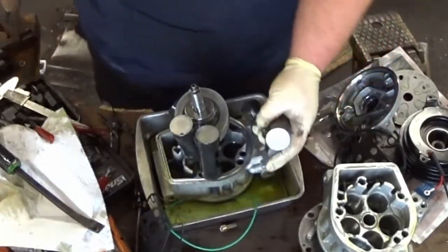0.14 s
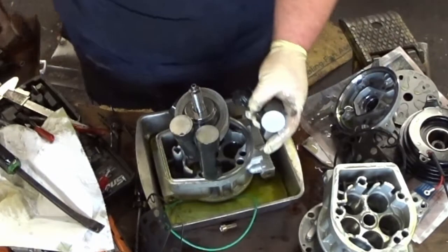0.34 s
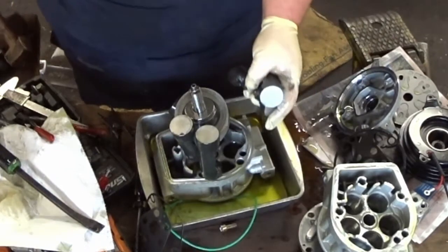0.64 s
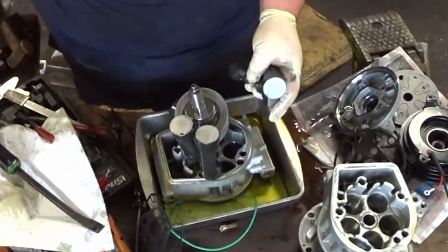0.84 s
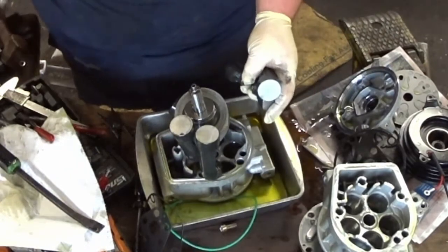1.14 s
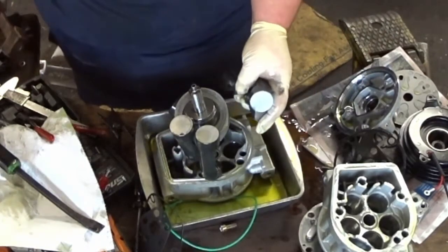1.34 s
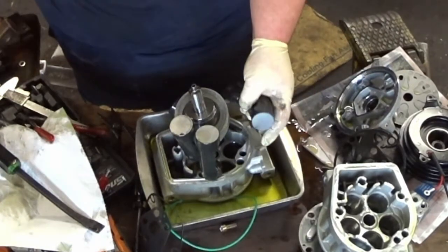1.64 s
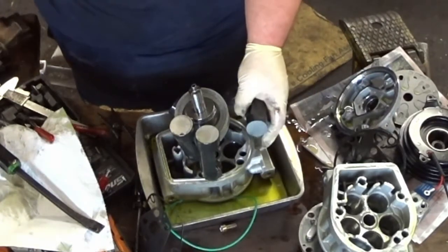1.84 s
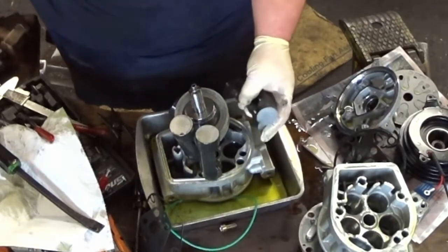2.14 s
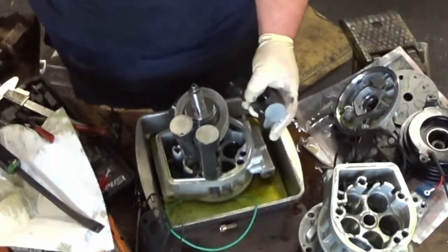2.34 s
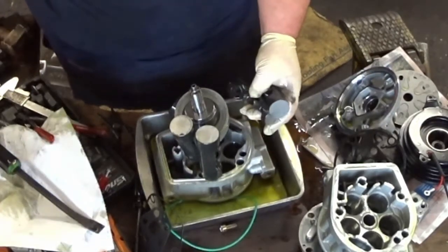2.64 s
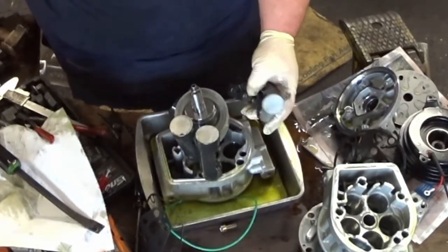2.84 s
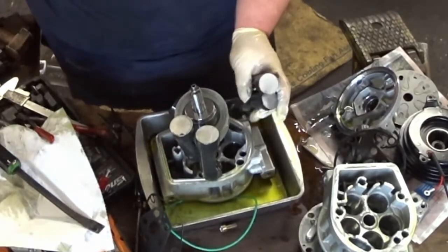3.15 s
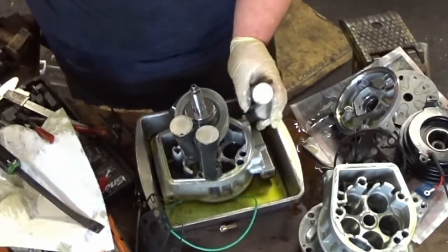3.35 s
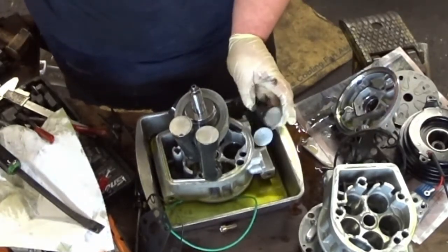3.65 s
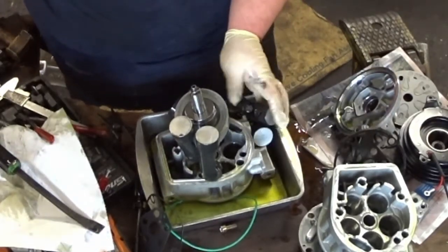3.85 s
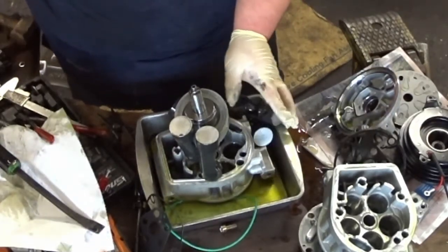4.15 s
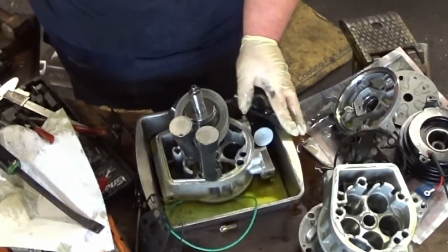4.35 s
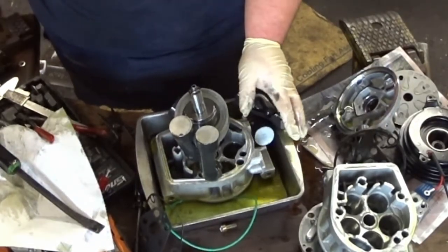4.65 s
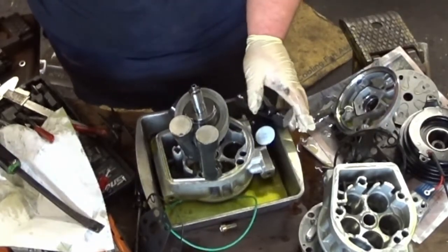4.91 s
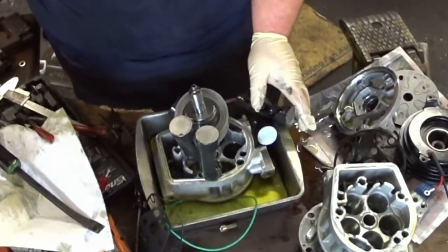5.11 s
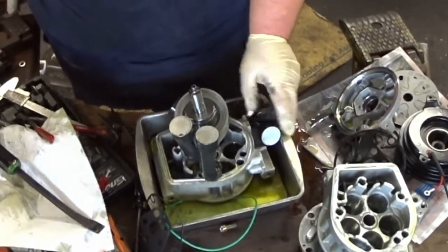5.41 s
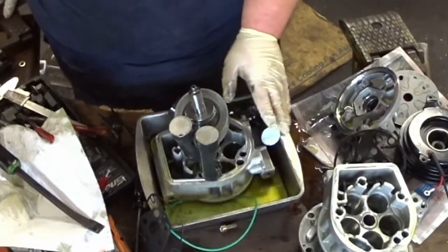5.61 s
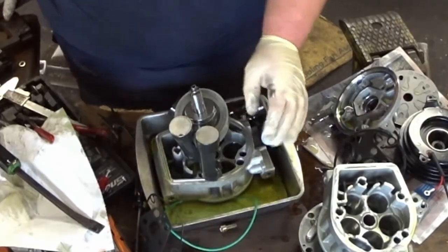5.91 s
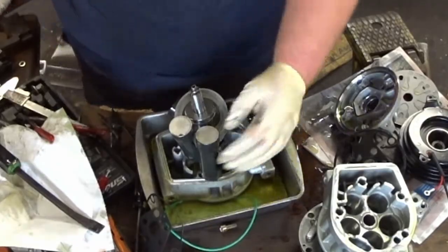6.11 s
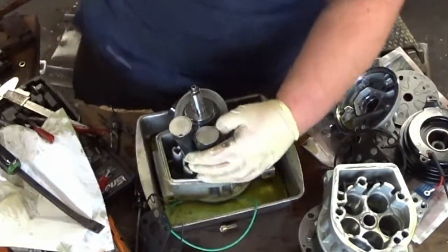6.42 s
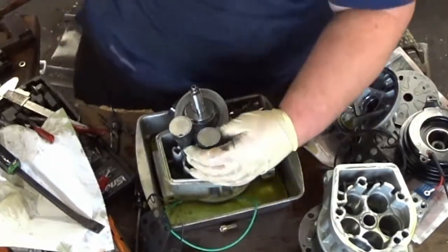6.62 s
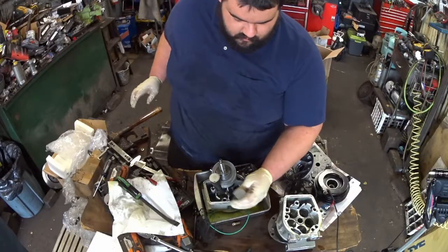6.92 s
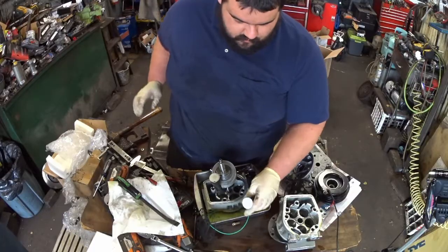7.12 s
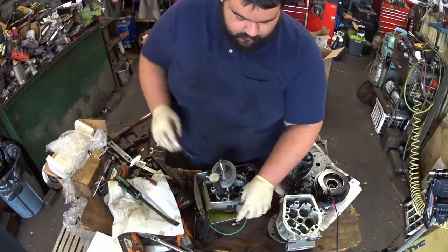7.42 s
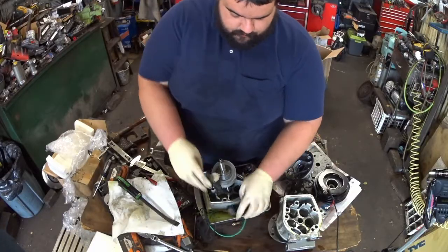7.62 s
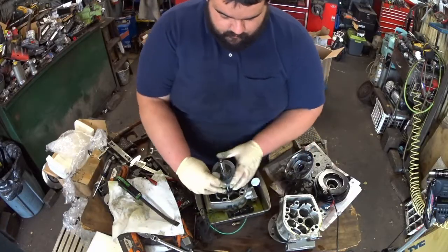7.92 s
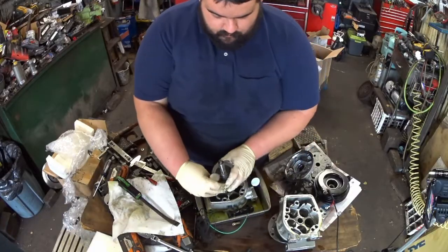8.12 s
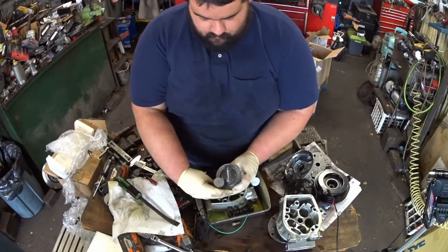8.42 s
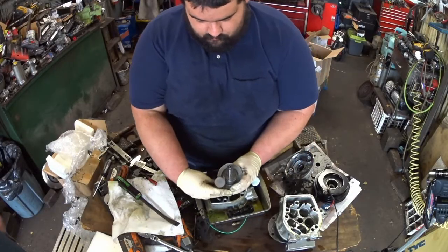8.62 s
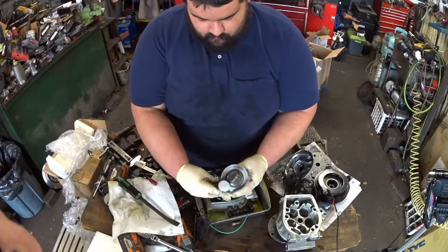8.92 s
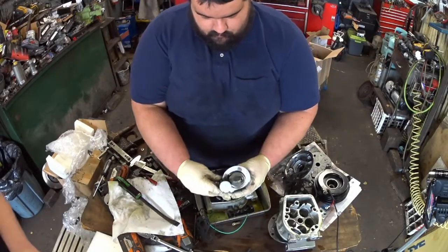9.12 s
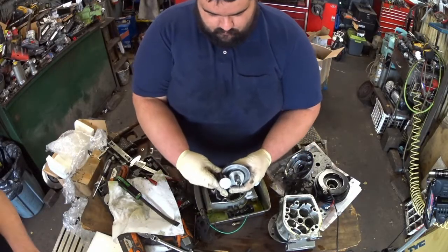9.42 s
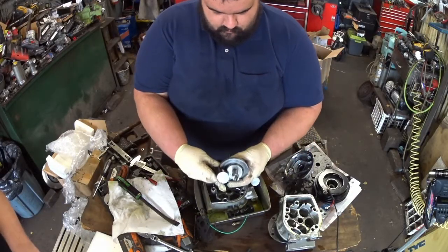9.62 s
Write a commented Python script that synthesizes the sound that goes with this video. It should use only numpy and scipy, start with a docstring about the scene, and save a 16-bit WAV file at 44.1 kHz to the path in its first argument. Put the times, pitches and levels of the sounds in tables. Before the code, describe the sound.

Greasy metal compressor parts clink, knock and clang against a heavy casing in a steel pan, with short rattles and scrapes in a quiet workshop.

```python
"""Compressor assembly on a bench

Greasy parts of a piston compressor are fitted by hand into their casing, in a steel pan on a workshop bench.
Each contact is a short noise crack, a dense clang and the decaying modes of the part that is struck.
Random slips, filtered or resonated, make the scrapes, crackles, rattles, drags and drone between blows.
Heavy blows and shoves swing low bench modes; two ports hear it all with a short echo and quiet shop air."""
import sys
import numpy as np
from scipy import signal
from scipy.fft import rfft, irfft, next_fast_len
from scipy.io import wavfile
from scipy.ndimage import uniform_filter1d

SR = 44100
rng = np.random.default_rng(int(sys.argv[2]) if len(sys.argv) > 2 else 0)


def int16_out(signal):
    """Quantize to a 16-bit WAV file."""
    q = np.round(np.clip(np.atleast_2d(signal).T, -1, 1) * 32767)
    wavfile.write(sys.argv[1], SR, q.astype(np.int16))


N = 430416
TIME_S = np.arange(N) / SR
BAND_EDGES_HZ = 56 * 2 ** (np.arange(17) / 2)

# Blows on the casing: [t/s, strength/dB, brightness/(dB/octave), ring re strength/dB, thud/dB]
CASING_HITS = [(0.4253, -38, -1.5, -3.5, -53), (0.5651, -46, -10, 4, -66), (1.0929, -19, 2, -12.5, -40),
               (1.3376, -46.5, -13.5, -2.5, -46.5), (1.367, -40.5, -4.5, 1, -54),
               (1.8139, -23.5, -1, 4.5, -43), (3.4187, -25, 0, -2.5, -23.5), (3.4487, -34, 3, -7, -59),
               (3.5433, -23, -1, -11, -37.5), (3.603, -35, 2, 1, -38), (3.7794, -25.5, 3, -4.5, -48),
               (3.8134, -33, 3, -14, -49.5), (3.8369, -30, 1.5, -3, -47.5), (4.3576, -30.5, -5.5, -20, -36),
               (5.1346, -21, 0, 4, -45), (5.198, -26.5, -1.5, 2.5, -39.5), (5.4769, -35, -0.5, -2, -39.5),
               (5.5036, -20, 0, -10, -30), (5.5467, -23.5, 3.5, -3, -63), (5.586, -23, 6, -9, -60),
               (5.7951, -47.5, -6, -15, -50.5), (7.3448, -40.5, -4.5, -34, -43), (7.5408, -23, 0, -20, -25),
               (7.5975, -25.5, -2, -8, -31), (7.6055, -24.5, 5, -7, -51), (7.7109, -22.5, -1.5, -13, -23.5),
               (7.7363, -27, -0.5, -19, -50), (8.67, -29.5, -0.5, -4, -30.5), (9.177, -55, -19, -4, -53),
               (9.4177, -44.5, -7, -8, -47.5)]
# Blows on lighter parts: [t/s, strength/dB, brightness/(dB/octave), ring re strength/dB]
PISTON_HITS = [(3.0044, -34, -6, -9), (3.0124, -30, -5, 12.5), (3.0331, -23, -1.5, 5.5)]
TING_HITS = [(1.998, -37, -4.5, 17.4), (2.081, -38, -4.5, 22), (2.199, -42.5, -4, 1.8),
             (4.0315, -49, -5.5, 16), (4.075, -72, 0, 21)]
CLINK_HITS = [(.6074, -40, 5.5, -5), (.6576, -28, 0, 2.5)]
SHAFT_HITS = [(7.1655, -25, 2, .5), (7.7554, -27, .7, -8)]
PLATE_HITS = [(3.425, -28, -9.5, -10), (3.5663, -22, -4, -13.5), (5.5554, -17.5, -5, -11),
              (7.6293, -25, 4.5, -12.5), (7.6805, -26, -8.5, -9), (7.7876, -23, -9, -7)]
SHOE_HITS = [(0.6074, -44, -7, 11.5), (0.835, -49.5, -6, 15), (0.8443, -31.5, 6, -24),
             (0.9191, -36, 2, 1.5), (0.9745, -31, 15.5, -5), (1.0079, -29.5, 12.5, -4),
             (1.0528, -30, 10, -2), (1.071, -44, -7, 21), (1.2847, -42, -2, -18), (2.5348, -54, 7, -5),
             (2.6064, -50.5, 6.5, -24), (3.5838, -40.5, 8.5, -0.5), (3.6597, -18.5, 1, -9.5),
             (8.3316, -50.5, 1.5, -5), (8.5129, -49, 1.5, -3.5), (8.94, -49, -1, -2.5)]
SEAT_HITS = [(5.6596, -8, 2.5, 13.7), (8.7617, -29, 6.5, 20.4), (8.8319, -18.5, 0.5, 31.5),
             (9.0254, -21.5, -4.5, 38.2)]

# Ringing modes of each struck part: [f/Hz, relative level/dB, t60/s]
CASING_MODES = [(146.6, -2, 0.3), (255, -3, 0.86), (650, -26, .1), (870, -5.5, 0.091), (1187, 8.5, 0.028),
                (1292, -2.5, 0.27), (1352, 1.5, 0.22), (1753, -7, 0.11), (1986, 0.5, 0.12),
                (2068, -2, 0.19), (3175, -2.5, 0.2), (3470, -6.5, 0.15), (3360, -21, 0.067),
                (4220, -11, 0.37), (4630, 9.5, 0.038), (5710, 2, 0.054), (5860, -4, 0.19),
                (8000, -3.5, 0.2), (10060, -8.5, 0.45)]
PISTON_MODES = [(1513, -9, .13), (1938, 0, .27), (3112, -9, .27), (3230, -7, .15), (3580, -6, .28),
                (4630, -14, .2), (5093, -8, .45), (5112, -13, .3), (5868, -5, .3), (6169, -6, .12),
                (6778, -8, .15), (7273, -7, .2), (8021, -13, .2), (8296, -8, .2), (10020, -20, .25)]
TING_MODES = [(965, -6, .07), (1938, 0, .5), (3941, -7, .25), (7268, -10, .2), (8296, -7, .17),
              (9695, -8, .15)]
CLINK_MODES = [(2990, -2, .35), (3200, -4, .06), (3500, 0, .28), (4810, -6, .3), (5690, -1, .33),
               (6820, -6, .12)]
SHAFT_MODES = [(1335, -8, .25), (1836, -9, .25), (2542, -3, .38), (2565, -7, .35), (3315, -7, .36),
               (3340, -11, .3), (4210, -11, .26), (4646, 0, .16), (4861, -7, .2), (5130, -6, .2),
               (5870, -7, .28), (5898, -11, .25), (8080, -9, .17), (10940, -11, .15)]
PLATE_MODES = [(2690, -17, 0.21), (3240, -8, 0.1), (3310, -3, 0.34), (3288, 12.5, 0.06), (4260, -38, 0.14),
               (5400, -10, .2), (5300, -14.5, 0.055)]
SHOE_MODES = [(4260, -1.5, 0.21), (4680, 8, 0.041), (4850, 8, 0.044), (5565, 15, 0.02), (6060, -8, 0.059),
              (8900, -7, 0.033), (8850, 13, 0.019), (9200, -4, 0.057), (10000, 10, 0.042)]
SEAT_MODES = [(3270, -21.5, 0.037), (3500, -9, 0.039), (4700, -42.5, 0.17), (5420, -33.5, 0.1),
              (5820, -31, 0.052), (9530, -21.5, 0.054)]

# Colour that pan and bench give every crack and clang: [f/Hz, level/dB]
BENCH_COLOUR = [(65, -55), (95, -49), (135, -1), (190, -2.5), (270, 5.5), (380, -1.5), (540, 2), (1100, 0),
                (1500, -2), (3000, -3), (6000, -1), (8600, 0), (12000, -3.5)]
# Dense clang of casing and pan: [f/Hz, level/dB]
CLANG_COLOUR = [(130, -1.5), (400, -0.5), (1400, 3.5), (3500, -1), (6000, -7), (11000, -16)]
# A contact: one hump tilted by hardness, plus a low thud
THUD_HZ, THUD_FALL_DB_PER_OCT, HARDEST_HZ = 223, 3, 7860
SOFTEST_HZ = 900  # tilt is constant below
CLANG_FOLLOWS_DB_PER_DB = 0.26  # share of a hit's ring level passed to the clang

# Bench top swinging under the casing: [f/Hz, level re thud/dB, t60/s]
THUMP_MODES = [(144, -3, 0.12), (254.5, 0.5, 0.14), (337, -9, .1)]
# Shoves of the bench: [t/s, level/dB]
SHOVES = [(2.202, -23), (8.672, -40)]
# Low modes in which the bench sways: [f/Hz, relative level/dB, t60/s]
SWAY_MODES = [(29.3, -14, 0.46), (46.5, -10.5, 0.29), (80, -12, 0.14), (105, -11, .13), (140, 1.5, 0.076),
              (281, -24.5, 0.99), (329, -13.5, 0.21)]

# Soft scrapes and rubs of hands and parts: [t/s, length/s, level/dB]
SCRAPES = [(1.27, 0.16, -62.5), (1.69, 0.068, -48), (2.25, .06, -41.5), (2.94, 0.16, -38.5),
           (5.33, 0.2, -43.5), (5.46, 0.34, -48), (6.65, 0.11, -50.5), (7.47, 0.39, -47),
           (7.58, 0.083, -35), (8.66, 0.27, -51.5), (8.95, 0.064, -41), (9.1, 0.18, -54.5)]
# Scrape spectrum: [f/Hz, level per Hz/dB]
SCRAPE_COLOUR = [(100, -14), (250, 0), (600, 1.5), (1100, -3), (2000, -13), (3500, -16.5), (6000, -24),
                 (11000, -31)]
# Oil film crackling as parts draw apart: [t/s, length/s, level/dB]
CRACKLES = [(1.1, 0.096, -42.5), (5.42, 0.17, -42.5), (6.0, 0.18, -57.5), (6.65, 0.14, -54.5),
            (7.83, 0.26, -48.5), (8.41, 0.059, -56), (8.65, 0.11, -48.5), (8.935, 0.02, -49),
            (9.17, 0.088, -61)]
# Shoe rattling in its socket: [t/s, length/s, level/dB]
RATTLES = [(3.578, 0.011, -45), (3.661, 0.18, -22)]
# Part catching, then dragging over the casing: [t/s, length/s, level/dB]
DRAGS = [(.563, 0.0065, -30.5), (.6, 0.25, -38)]
# Plate turned by hand: [t/s, length/s, level/dB]
TURNS = [(8.16, .02, -54), (8.245, .16, -53), (8.8, 0.056, -38), (8.94, 0.1, -41.5), (9.04, 0.26, -41),
         (9.38, 0.017, -46)]
# Modes driven by slips: [f/Hz, level before a -6 dB/octave tilt/dB, t60/s]
RATTLE_MODES = [(2580, -9.5, 0.097), (3200, -1, 0.024), (3360, 8.5, 0.0098), (4700, -6, 0.026),
                (5360, -3, 0.041), (9070, -1, 0.022), (9100, 4, 0.019), (9150, -9, 0.0061),
                (10200, -22, .008)]
DRAG_MODES = [(1037, 1, 0.072), (1007, -2, 0.076), (1136, 0.5, 0.1), (1093, -11, 0.13), (1820, -2.5, 0.056),
              (2970, -20, 0.084), (3430, -21, 0.061)]
PAN_MODES = [(153, 0.5, 0.26), (163.2, 3, 0.21), (216, -12, 0.076), (248, 12, 0.25), (269, -32, 0.055),
             (570, -1, 0.11)]
WAVER_PER_S, WAVER_DB = 18, 2.5  # uneven grip on the plate

# Lead of the right port over the left: [f/Hz, phase/rad]
PORT_PHASE = [(20, .05), (120, 0.49), (430, 1.03), (950, 1.55), (2000, 1.34), (4000, 0.78), (6200, 0.56),
              (11000, 0.33)]
# Decay of the shop: [f/Hz, t60/s]
ROOM_T60 = [(100, 0.71), (500, 0.48), (2000, 0.54), (5000, 0.64), (11000, 0.42)]
# Air of the shop, spectrum: [f/Hz, level per Hz/dB]
AIR_COLOUR = [(15, -22), (25, -7.5), (64, -2), (192, -4), (311, -5.5), (444, -7), (531, -12), (635, -8),
              (1230, -11.5), (1330, -12), (1430, -10.5), (2210, -12), (3080, -13.5), (5970, -14.5),
              (11000, -18), (14300, -114), (22000, -120)]
# Difference between ports in a diffuse field: [f/Hz, side re mid/dB]
AIR_SIDE = [(60, -14), (130, -9), (270, -4), (570, 2.5), (1200, 3.5), (2600, 0.5), (5500, -4),
            (11000, -6.5)]
AIR_DB = -56.5  # before widening
CUTOFF_HZ = 11100


def blows():
    """All contacts, part by part."""
    heavy = casing_blows() + piston_clangs() + shaft_blows() + plate_blows()
    return heavy + piston_tings() + piston_clinks() + shoe_blows() + seat_blows()


def casing_blows():
    """Wide casing, hit on a new spot each time: mode levels scatter."""
    return struck(CASING_HITS, CASING_MODES, centre_hz=1860, arch_db=2.5, crack_db=-1, ring_db=-7,
                  clang_db=-12, crack_t60_s=0.048, rise_s=0.00027, clang_t60_s=0.4, scatter_db=3)


def piston_clangs():
    """Piston clang: many modes, slow onset."""
    return struck(light(PISTON_HITS, thud_db=-18), PISTON_MODES, centre_hz=3400, arch_db=4.0, crack_db=0.5,
                  ring_db=-4.0, clang_db=-17, crack_t60_s=0.021, rise_s=0.0012, clang_t60_s=0.26)


def shaft_blows():
    """Shaft: paired close modes beat."""
    return struck(light(SHAFT_HITS, thud_db=-12), SHAFT_MODES, centre_hz=3150, arch_db=1.6, crack_db=2.5,
                  ring_db=-1.0, clang_db=-11.5, crack_t60_s=0.04, rise_s=0.00075, clang_t60_s=0.23)


def plate_blows():
    """Plate: ring gained well above its crack."""
    return struck(light(PLATE_HITS, thud_db=-18), PLATE_MODES, centre_hz=3420, arch_db=6.5, crack_db=-5.5,
                  ring_db=6.5, clang_db=-18, crack_t60_s=0.028, rise_s=0.0006, clang_t60_s=0.3)


def piston_tings():
    """Light piston ting: few modes, short crack."""
    return struck(light(TING_HITS, thud_db=-8), TING_MODES, centre_hz=1870, arch_db=2.5, crack_db=-0.5,
                  ring_db=-5.5, clang_db=-22.5, crack_t60_s=0.011, rise_s=0.00062, clang_t60_s=0.26)


def piston_clinks():
    """Piston clink: high modes with a very weak thud."""
    return struck(light(CLINK_HITS, thud_db=-31), CLINK_MODES, centre_hz=3440, arch_db=6.5, crack_db=2,
                  ring_db=-8, clang_db=-8.5, crack_t60_s=0.019, rise_s=0.00036, clang_t60_s=0.25)


def shoe_blows():
    """Small steel shoes: high, mostly brief modes."""
    return struck(light(SHOE_HITS, thud_db=-20), SHOE_MODES, centre_hz=3410, arch_db=3.5, crack_db=-2.5,
                  ring_db=-1.5, clang_db=-18, crack_t60_s=0.022, rise_s=0.00058, clang_t60_s=0.85)


def seat_blows():
    """Seat: short crack, weak clang, brief modes."""
    return struck(light(SEAT_HITS, thud_db=-13), SEAT_MODES, centre_hz=1850, arch_db=4, crack_db=-13,
                  ring_db=-6.5, clang_db=-30, crack_t60_s=0.0096, rise_s=0.0011, clang_t60_s=0.24)


def light(hits, thud_db):
    """A light part thuds in proportion to the strength of its blow."""
    return [(s, db, bright, ring, db + thud_db) for s, db, bright, ring in hits]


def struck(hits, modes, centre_hz, arch_db, crack_db, ring_db, clang_db,
           crack_t60_s, rise_s, clang_t60_s, scatter_db=0):
    """Blows on one part; a harder contact favours higher modes, the next touch chokes the ring."""
    out = np.zeros(N)
    hz, mode_db, t60_s = np.transpose(modes)
    t = np.arange(SR * 3 // 5) / SR
    decays = from_db(-60 * t / t60_s[:, None])
    rings = np.sin(2 * np.pi * hz[:, None] * t) * decays * (1 - np.exp(-t / rise_s))
    rings[::2] *= -1
    drives_db = contact(hits, hz, centre_hz, arch_db)
    drives_db = drives_db + scatter_db * rng.standard_normal((len(hits), len(hz)))
    free_s = np.diff([hit[0] for hit in hits], append=np.inf)
    noises = cracks(hits, centre_hz, arch_db, clang_db, crack_t60_s, rise_s, clang_t60_s)
    for (s, _, _, ring, _), crack, drive_db, free in zip(hits, noises, drives_db, free_s):
        gains = from_db(ring_db + ring + mode_db + drive_db)
        choke = np.exp(-np.maximum(t - free, 0) / .008)
        add(out, s, from_db(crack_db) * crack)
        add(out, s, (gains @ rings) * choke)
    return out


def contact(hits, hz, centre_hz, arch_db):
    """Level/dB each blow (row) hands each frequency (column): a tilted hump or a low thud."""
    _, db, bright, _, thud = np.transpose(hits)[:, :, None]
    hz = np.clip(hz, THUD_HZ, HARDEST_HZ)
    tilt = bright * np.log2(np.maximum(hz, SOFTEST_HZ) / centre_hz)
    hump = db + tilt - arch_db * np.log2(hz / centre_hz) ** 2
    return np.maximum(hump, thud - THUD_FALL_DB_PER_OCT * np.log2(hz / THUD_HZ))


def cracks(hits, centre_hz, arch_db, clang_db, crack_t60_s, rise_s, clang_t60_s, spacing_hz=11):
    """Each contact cracks like noise, then the many close modes of casing and pan clang on."""
    t = np.arange(SR // 2) / SR
    first = SR // 100  # samples
    white = rng.standard_normal((len(hits), 2, len(t)))
    # about one mode per spacing_hz; each blow shares its energy among them anew
    grid_hz = np.fft.rfftfreq(len(t), 1 / SR)
    is_mode = rng.random(len(grid_hz)) < grid_hz[1] / spacing_hz
    chord = rms_one(irfft(rfft(rng.standard_normal(white.shape)) * is_mode, len(t)))
    rings_db = np.array([[ring] for _, _, _, ring, _ in hits])
    clangs_db = clang_db + CLANG_FOLLOWS_DB_PER_DB * rings_db
    onset = 1 - np.exp(-t / rise_s)
    sounds = 0
    for k, (hz, sos) in enumerate(bands()):
        band_t60_s = crack_t60_s * (hz / 2000) ** -.15
        crack = from_db(-60 * t / band_t60_s)
        clang = from_db(clangs_db + at_hz(CLANG_COLOUR, hz)) * from_db(-60 * t / clang_t60_s)
        source = onset * (white[:, k % 2] * crack + chord[:, k % 2] * clang)
        band = signal.sosfilt(sos, source)
        # set early energy per band; low bands take a few cycles to build up
        early = band[:, :first + round(3 * SR / hz)]
        strength = np.sqrt(np.sum(early ** 2, axis=1) / first * 2)
        db = contact(hits, hz, centre_hz, arch_db) + at_hz(BENCH_COLOUR, hz)
        sounds = sounds + band * from_db(db) / strength[:, None]
    return sounds


def bench():
    """The bench thumps under blows on the casing and sways when shoved."""
    thuds = [(s, thud) for s, *_, thud in CASING_HITS]
    return swing(SHOVES, SWAY_MODES) + swing(thuds, THUMP_MODES)


def swing(pushes, modes):
    """Soft pushes set low modes swinging, neighbouring modes in opposite directions."""
    out, t = np.zeros(N), np.arange(SR) / SR
    motion = 0
    for k, (hz, db, t60_s) in enumerate(modes):
        sign = -(-1) ** k
        motion = motion + sign * from_db(db - 60 * t / t60_s) * np.sin(2 * np.pi * hz * t)
    for s, db in pushes:
        add(out, s, from_db(db) * motion * (1 - np.exp(-t / .003)))
    return out


def handling():
    """Stick and slip between the blows."""
    return scrapes() + oil_crackles() + shoe_rattle() + casing_drag() + pan_drone()


def scrapes():
    """Scrapes and rubs: dense slips, coloured mostly low."""
    return swells(SCRAPES) * rms_one(coloured(grains(per_s=2100, spread_db=3.5), SCRAPE_COLOUR))


def oil_crackles():
    """Oil film parting: uneven grains in the high band."""
    oil_band = signal.butter(2, [5500, 11000], "band", fs=SR, output="sos")
    oil = signal.sosfilt(oil_band, grains(per_s=3700, spread_db=5.5) + 1e-18)
    return swells(CRACKLES) * rms_one(oil)


def shoe_rattle():
    """Shoe in its socket: slips drive short, high modes."""
    push = strokes(RATTLES, attack_s=0.0024, sag_db_per_s=113, release_db_per_s=224)
    return push * rubbed(RATTLE_MODES, per_s=3600, even_s=0.066)


def casing_drag():
    """A dragged part makes the casing sing through slip-driven modes."""
    push = strokes(DRAGS, attack_s=0.0036, sag_db_per_s=22, release_db_per_s=404)
    return push * rubbed(DRAG_MODES, per_s=1500, even_s=0.016)


def pan_drone():
    """Turning the plate excites low pan modes; negative sag: each turn grows."""
    push = strokes(TURNS, attack_s=0.0098, sag_db_per_s=-3.5, release_db_per_s=500)
    return push * rubbed(PAN_MODES, per_s=260, even_s=0.074) * waver()


def grains(per_s, spread_db):
    """Random tiny slips of uneven size and either sign."""
    is_slip = rng.random(N) < per_s / SR
    size = from_db(spread_db * np.minimum(rng.exponential(1, N), 4))
    return is_slip * rng.choice([-1, 1], N) * size


def rubbed(modes, per_s, even_s):
    """Dense slips excite modes; division by running rms keeps the strength even."""
    tilted = [(hz, db - 20 * np.log10(hz / 1000), t60_s) for hz, db, t60_s in modes]
    ring = resonate(np.diff(grains(per_s, spread_db=4.0), prepend=0), tilted)
    power = np.maximum(uniform_filter1d(ring ** 2, size=round(even_s * SR)), 0)
    return ring / np.sqrt(power + 1e-12)


def resonate(force, modes):
    """A force drives two-pole resonators, one per mode."""
    out = 0
    for hz, db, t60_s in modes:
        r, w = from_db(-60 / (t60_s * SR)), 2 * np.pi * hz / SR
        ring = signal.lfilter([0, np.sin(w)], [1, -2 * r * np.cos(w), r * r], force + 1e-18)
        out = out + from_db(db) * ring
    return out


def swells(rows):
    """Gain of strokes that rise and fade as half sines."""
    out = 0
    for s, length_s, db in rows:
        progress = np.clip((TIME_S - s) / length_s, 0, 1)
        out = out + from_db(db) * np.sin(np.pi * progress ** 0.96)
    return out


def strokes(rows, attack_s, sag_db_per_s, release_db_per_s):
    """Gain of pushes: linear attack, steady sag in dB, then release."""
    out = 0
    for s, length_s, db in rows:
        t = np.maximum(TIME_S - s, 0)
        sag_db = sag_db_per_s * np.minimum(t, length_s)
        fall_db = sag_db + release_db_per_s * np.maximum(t - length_s, 0)
        out = out + np.minimum(t / attack_s, 1) * from_db(db - np.minimum(fall_db, 200))
    return out


def waver():
    """Gain wandering between random levels."""
    steps = rng.standard_normal(SR // 50)
    return from_db(WAVER_DB * np.interp(TIME_S * WAVER_PER_S, np.arange(len(steps)), steps))


def ports(x):
    """Sound from the bench leads in phase at the right port."""
    size = next_fast_len(N + SR // 10)
    lead_rad = np.clip(at_hz(PORT_PHASE, np.fft.rfftfreq(size, 1 / SR)), 0, 2)
    side = irfft(rfft(x, size) * 1j * np.tan(lead_rad / 2), size)[:N]
    return np.array([x - side, x + side])


def workshop(x, wet_db, ramp_s):
    """The cluttered shop returns a short diffuse tail, decaying per band."""
    t = np.arange(SR * 3 // 5) / SR
    white = rng.standard_normal((2, 2, len(t))) * np.clip(t / ramp_s - .3, 0, 1)
    tail = 0
    for k, (hz, sos) in enumerate(bands()):
        tail = tail + signal.sosfilt(sos, white[k % 2] * from_db(-60 * t / at_hz(ROOM_T60, hz)))
    tail = diffuse(tail / np.sqrt(np.sum(tail[0] ** 2)))
    return from_db(wet_db) * signal.fftconvolve(x[None], tail, axes=1)[:, :N]


def shop_air():
    """Quiet air: coloured noise from all sides."""
    noise = rms_one(coloured(rng.standard_normal((2, N)), AIR_COLOUR))
    return from_db(AIR_DB) * diffuse(noise)


def diffuse(pair):
    """Two unrelated sounds, as mid and side, become a field from all sides."""
    mid, side = pair[0], coloured(pair[1], AIR_SIDE)
    return np.array([mid + side, mid - side])


def from_db(db):
    """Decibels to gain."""
    return 10 ** (np.asarray(db) / 20)


def rms_one(x):
    """Scale to unit rms."""
    return x / np.sqrt(np.mean(x ** 2) + 1e-20)


def at_hz(points, hz):
    """Read (f/Hz, value) points on a log-frequency axis."""
    known, values = np.transpose(points)
    return np.interp(np.log(np.maximum(hz, 1)), np.log(known), values)


def coloured(x, spectrum):
    """Shape a sound by (f/Hz, level/dB) points."""
    size = next_fast_len(x.shape[-1])
    gain = from_db(at_hz(spectrum, np.fft.rfftfreq(size, 1 / SR)))
    return irfft(rfft(x, size) * gain, size)[..., :x.shape[-1]]


def bands():
    """Half-octave filters with their centres/Hz."""
    return [(np.sqrt(lo * hi), signal.butter(2, [lo, hi], "band", fs=SR, output="sos"))
            for lo, hi in zip(BAND_EDGES_HZ, BAND_EDGES_HZ[1:])]


def add(out, s, sound):
    """Mix a sound in at s seconds."""
    i = round(s * SR)
    out[i:i + len(sound)] += sound[:N - i]


def scene():
    """Work at the bench, its echo and the air of the shop."""
    work = blows() + bench() + handling()
    return ports(work) + workshop(work, wet_db=-16.5, ramp_s=0.0084) + shop_air()


def record(dry):
    """Round the loudest peaks, cut the top."""
    top = 0.56
    rounded = top * np.tanh(dry / top)
    return signal.sosfilt(signal.ellip(10, .2, 75, CUTOFF_HZ, fs=SR, output="sos"), rounded)


dry = scene()
out = record(dry)
int16_out(out)
```